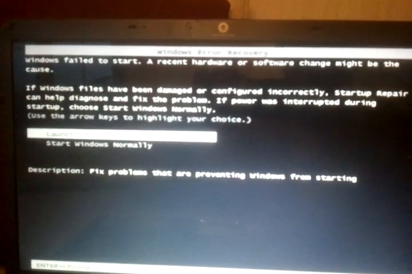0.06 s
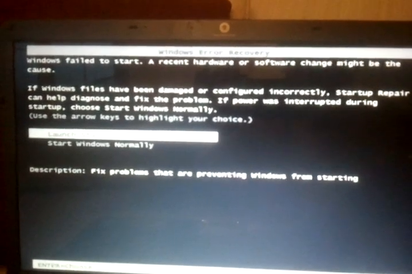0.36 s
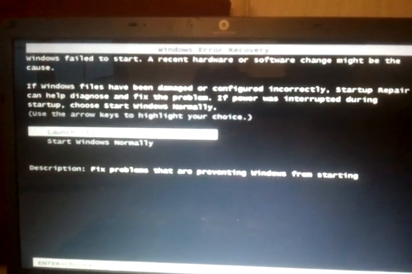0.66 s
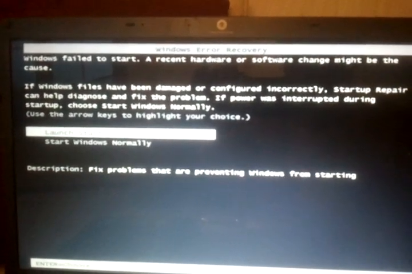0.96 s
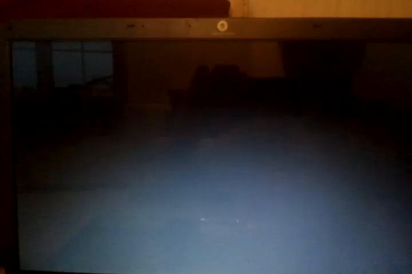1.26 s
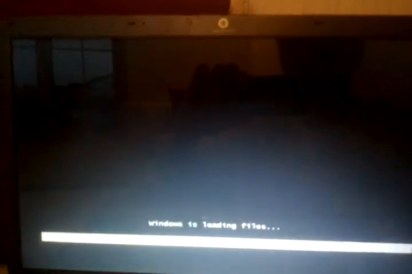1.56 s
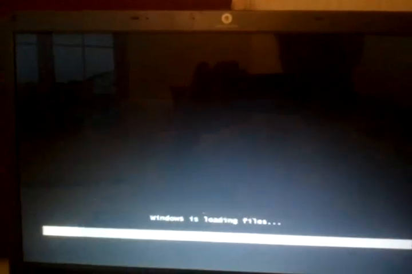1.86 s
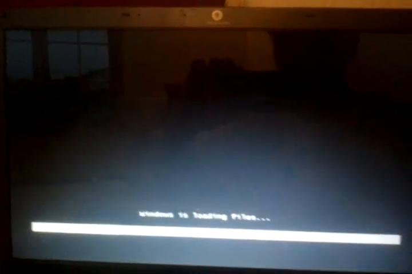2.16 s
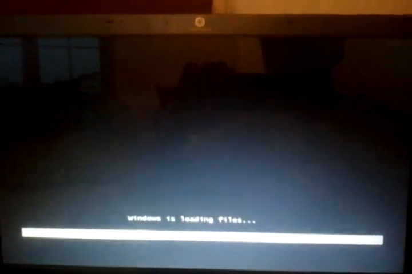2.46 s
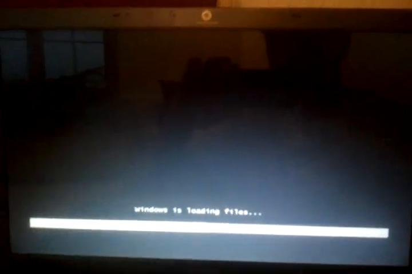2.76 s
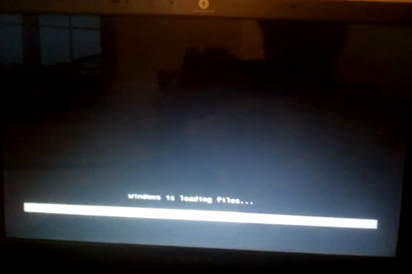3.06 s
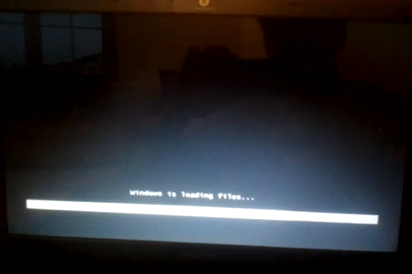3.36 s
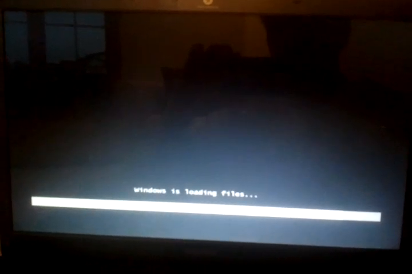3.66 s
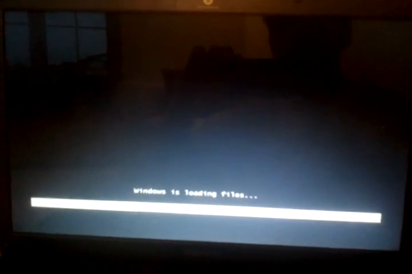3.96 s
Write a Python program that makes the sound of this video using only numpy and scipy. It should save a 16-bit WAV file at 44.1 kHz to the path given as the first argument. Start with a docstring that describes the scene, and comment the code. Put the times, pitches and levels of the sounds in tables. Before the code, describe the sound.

A laptop fan hisses steadily over a low rumble in a quiet room. One key clicks sharply in its plastic case, then a soft rustle and two dull bumps come on the close, hand-held microphone.

```python
"""Laptop fan and one keystroke

In a quiet room a laptop fan hisses steadily over a low rumble; a faint whine comes and goes.
One key is pressed and let go, rattling in the plastic case. Later come a soft rustle and two dull
handling bumps on the close, hand-held microphone, which is narrow in band and has a constant offset."""
import sys
import numpy as np
from scipy import signal
from scipy.fft import rfft, irfft
from scipy.io import wavfile

SR = 44100
rng = np.random.default_rng(int(sys.argv[2]) if len(sys.argv) > 2 else 0)


def file_out(sig):
    """Save sig as 16-bit WAV at sys.argv[1]."""
    # one column per channel
    cols = np.atleast_2d(sig).T
    # limit, then scale
    lim = np.clip(cols, -1, 1)
    pcm = np.round(lim * 32767).astype(np.int16)
    wavfile.write(sys.argv[1], SR, pcm)


N = 176400
TIME = np.arange(N) / SR


def from_db(db):
    """Decibels to gain."""
    return 10 ** (np.asarray(db) / 20)


def unit_rms(x):
    """Scale to an rms of 1."""
    return x / np.sqrt(np.mean(x ** 2) + 1e-20)


def noise(spectrum):
    """Unit noise coloured by (freq_hz, level_db) rows, falling away steeply beyond their ends."""
    hz, db = np.transpose(spectrum)
    f = np.maximum(np.fft.rfftfreq(N, 1 / SR), 1)
    skirts = 1 / np.sqrt((1 + (hz[0] / 2 / f) ** 6) * (1 + (f / 2 / hz[-1]) ** 6))
    gain = from_db(np.interp(np.log(f), np.log(hz), db)) * skirts
    return unit_rms(irfft(rfft(rng.standard_normal(N)) * gain, N))


def drift(rate_hz):
    """Random wander of unit rms, mostly slower than rate_hz."""
    f = np.fft.rfftfreq(N, 1 / SR)
    return unit_rms(irfft(rfft(rng.standard_normal(N)) / (1 + (f / rate_hz) ** 2), N))


def impulses(start_s, level_db):
    """One impulse for each blow."""
    blows = np.zeros(N)
    blows[(np.asarray(start_s) * SR).astype(int)] = from_db(level_db)
    return blows


def ring(blows, hz, t60_s):
    """A damped mode: a unit impulse sets a sine of height 1 ringing."""
    radius = from_db(-60 / (t60_s * SR))
    angle = 2 * np.pi * hz / SR
    return signal.lfilter([0, np.sin(angle)], [1, -2 * radius * np.cos(angle), radius ** 2], blows + 1e-18)


def decay(blows, t60_s):
    """Envelope that jumps at each blow and dies away."""
    energy_kept = from_db(-120 / (t60_s * SR))
    return np.sqrt(signal.lfilter([1], [1, -energy_kept], blows ** 2 + 1e-18))


def swell(centre_s, length_s):
    """A smooth rise and fall."""
    return np.cos(np.pi * np.clip((TIME - centre_s) / length_s, -.5, .5)) ** 2


# Low rumble of the room, all around the microphone: freq_hz, level_db
RUMBLE_SPECTRUM = [(15, -4), (30, -0.5), (50, -2), (80, -3), (120, -7), (180, -10.5), (260, -18),
                   (500, -37.5)]
# Its slow rise and fall: time_s, gain_db
RUMBLE_LEVEL = [(0, 0.3), (.9, -.5), (1.4, 1), (2, -1), (2.6, 0), (3.2, -0.9), (4, -0.6)]


def room_rumble():
    """Slightly lumpy low noise of the room."""
    level_db = -46.5 + np.interp(TIME, *np.transpose(RUMBLE_LEVEL))
    return from_db(level_db + 2 * drift(rate_hz=5)) * noise(RUMBLE_SPECTRUM)


# Fan air and background hiss, close to the laptop: freq_hz, level_db
HISS_SPECTRUM = [(200, -2.5), (330, 1), (500, -1.5), (850, -4), (1030, -2.5), (1300, -5.5), (1600, -6.5),
                 (1800, -6), (2100, -9), (2800, -10.5), (4200, -11.5), (6000, -14), (6600, -19.5),
                 (7200, -30)]
# The hiss holds nearly steady, with a slight dip late on: time_s, gain_db
HISS_LEVEL = [(0, 0), (.9, 0.37), (1.6, 0), (2.2, 0.3), (2.65, 0.14), (3.2, -1.4), (3.6, -0.65), (4, 0)]


def fan_hiss():
    """Turbulent air from the fan makes a smooth hiss."""
    level_db = -50 + np.interp(TIME, *np.transpose(HISS_LEVEL))
    return from_db(level_db) * noise(HISS_SPECTRUM)


# Swells of a whine, faint at the microphone: centre_s, length_s, pitch_hz, level_db
WHINE_SWELLS = [(.99, 0.23, 1693, -60.5), (1.2, .2, 1697, -66), (1.91, .2, 1704, -60.5),
                (2.088, 0.27, 1765, -57)]


def whine():
    """A thin, wavering tone that surfaces from the hiss."""
    wobble_hz = 5 * drift(rate_hz=26.3)
    sound = np.zeros(N)
    for centre_s, length_s, pitch_hz, level_db in WHINE_SWELLS:
        tone = np.sqrt(2) * np.sin(2 * np.pi * np.cumsum(pitch_hz + wobble_hz) / SR)
        sound += from_db(level_db) * swell(centre_s, length_s) * tone
    return sound


# Soft rustle at the microphone: freq_hz, level_db
RUSTLE_SPECTRUM = [(400, -5), (1000, 2.5), (2200, 0), (3000, -13), (4200, -2.5), (6300, -11), (7200, -26)]


def rustle():
    """A brief, soft brushing sound."""
    level_db = -51.5 + 1.4 * drift(rate_hz=60)
    return from_db(level_db) * swell(centre_s=1.785, length_s=.15) * noise(RUSTLE_SPECTRUM)


# Bumps right on the hand-held microphone: start_s, level_db, pitch_hz, t60_s
HANDLING_BUMPS = [(2.2307, -31.5, 115, 0.023), (2.8980, -29, 101, 0.033)]


def handling_bumps():
    """Handling gives low, quickly damped thuds, each with a small knock."""
    sound = np.zeros(N)
    for start_s, level_db, pitch_hz, t60_s in HANDLING_BUMPS:
        thud = ring(impulses(start_s, level_db), pitch_hz, t60_s)
        knock = ring(impulses(start_s, level_db - 4), hz=245, t60_s=.016)
        sound += thud + knock
    return sound


# One key near the microphone, its contacts going down and coming up: start_s, level_db, case_gain_db
KEY_CONTACTS = [(1.1332, -4, -16), (1.1363, -6.5, -6), (1.1376, 1, -1), (1.1401, -5.5, 7.5),
                (1.2285, -16, -11), (1.2323, -1.5, -6), (1.2360, -11, 8)]
# Bright ring of the keycap and deck: pitch_hz, level_db, t60_s
KEYCAP_MODES = [(1390, -45.5, 0.037), (1710, -47, 0.049), (2060, -50, .025), (3220, -51.5, 0.019),
                (3716, -44.5, 0.022), (4400, -42, 0.0094), (4850, -41, 0.013), (5690, -47, 0.039),
                (6300, -49, 0.012)]
# Body of the plastic case under the key: pitch_hz, level_db, t60_s
CASE_MODES = [(336, -46.5, 0.065), (394, -39.5, 0.033)]
# Thud of the whole laptop as the key hits bottom: pitch_hz, level_db, t60_s
THUD_MODES = [(69, -38.5, .25), (127, -33.5, 0.14), (175, -40, .03)]
# Crack of each contact, heard close up: freq_hz, level_db
CRACK_SPECTRUM = [(400, -6), (1300, 0), (2200, 1.5), (2700, -22), (3500, -3), (4700, 6.5), (6000, -4),
                  (7200, -23)]


def keystroke(bottom_out_s=1.1404, scatter_db=1.7):
    """Each contact cracks and rings keycap and case; bottoming out thuds; the room adds a faint tail."""
    start_s, level_db, case_gain_db = np.transpose(KEY_CONTACTS)
    keycap, case, thud = np.zeros((3, N))
    for hz, mode_db, t60_s in KEYCAP_MODES:
        strike_db = level_db + mode_db + rng.normal(0, scatter_db, len(start_s))
        keycap += ring(impulses(start_s, strike_db), hz, t60_s)
    for hz, mode_db, t60_s in CASE_MODES:
        case += ring(impulses(start_s, level_db + case_gain_db + mode_db), hz, t60_s)
    for hz, mode_db, t60_s in THUD_MODES:
        thud += ring(impulses(bottom_out_s, mode_db), hz, t60_s)
    blows = impulses(start_s, level_db)
    crack = from_db(-32.5) * decay(blows, t60_s=.0082) * noise(CRACK_SPECTRUM)
    room_tail = from_db(-51) * decay(blows, t60_s=.22) * noise(HISS_SPECTRUM)
    return keycap + crack + room_tail - case - thud  # case and thud start in opposite polarity


def scene():
    """Everything at one close microphone."""
    return (room_rumble() + fan_hiss() + whine() + rustle() + handling_bumps() + keystroke())[None]


def record(dry):
    """The microphone cuts the treble steeply and its signal rides on a constant offset."""
    cutoff_hz, offset = 7150, -.42
    lowpass = signal.ellip(10, .1, 70, cutoff_hz, fs=SR, output="sos")
    return signal.sosfilt(lowpass, dry) + offset


dry = scene()
out = record(dry)
file_out(out)
```